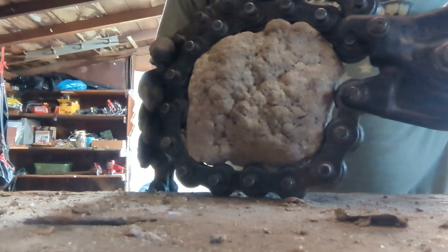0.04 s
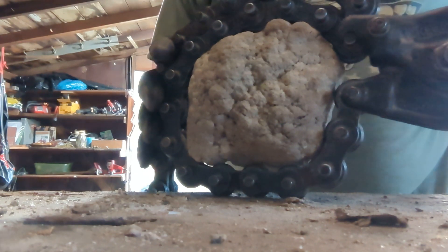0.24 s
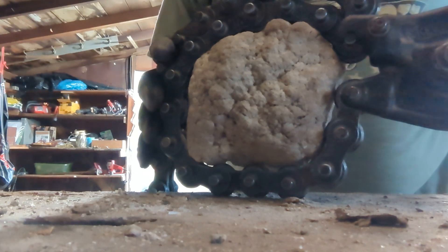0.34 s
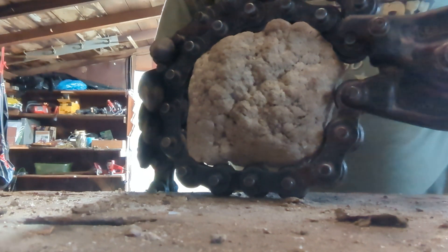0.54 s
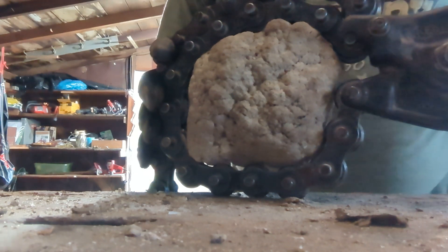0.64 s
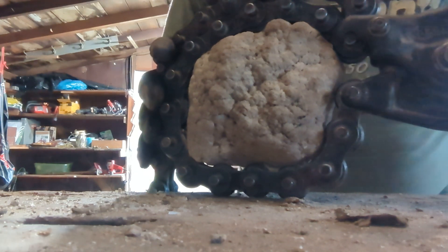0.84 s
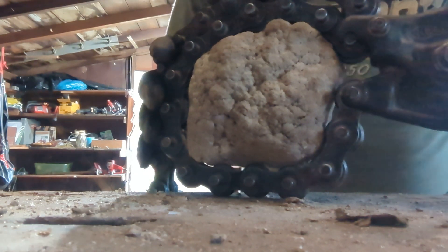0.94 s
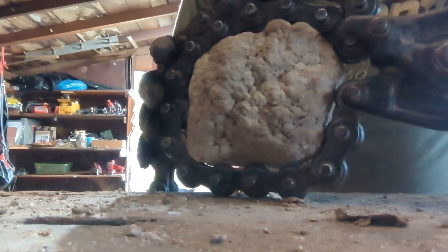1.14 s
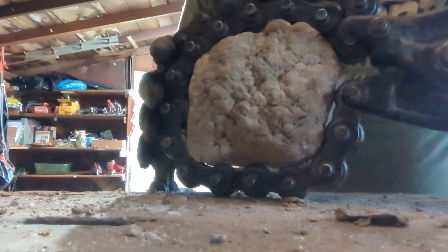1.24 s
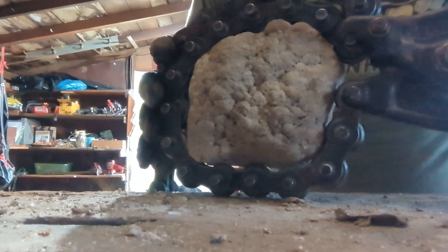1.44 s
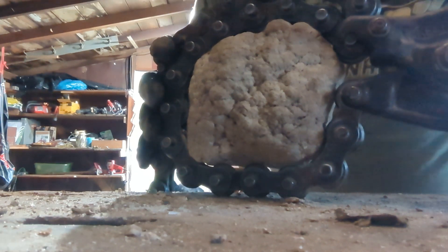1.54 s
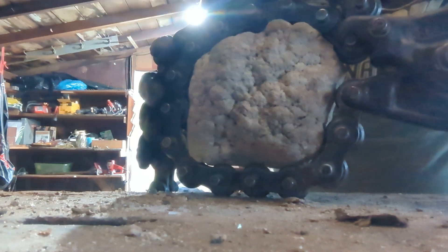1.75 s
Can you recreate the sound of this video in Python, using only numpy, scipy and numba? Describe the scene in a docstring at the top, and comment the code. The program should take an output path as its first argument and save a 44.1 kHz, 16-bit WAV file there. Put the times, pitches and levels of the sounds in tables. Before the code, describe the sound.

Stone cracks and clicks under a chain wrench, heard close up in a small workshop. One hard slip clanks the links and thumps the bench, then smaller cracks continue with fine gritty crackle over a faint low rumble.

```python
"""A small workshop, the microphone a hand's width from a stone on the bench, a chain wrench round it.
Over a low rumble the chain tightens, and grains crush under the links in sharp clicks.
At 0.2 s it slips hard: the links ring, the bench knocks, the stone shifts and the room answers.
The recorder turns itself down after the loudest cracks. More clicks and lighter slips follow,
and from about 0.8 s fine grit crackles louder as the chain is drawn tight."""
import sys
import numpy as np
from scipy import signal
from scipy.fft import rfft, irfft
from scipy.io import wavfile
from scipy.ndimage import uniform_filter1d, minimum_filter1d
from numba import njit

SR = 44100
rng = np.random.default_rng(int(sys.argv[2]) if len(sys.argv) > 2 else 0)


def to_wav(sig):
    """Store sig (one row per channel, or 1-D mono) as 16-bit WAV at the path in sys.argv[1].

    Samples outside -1..1 are clipped; the rate is SR.
    """
    pcm = np.clip(np.atleast_2d(sig), -1, 1) * 32767
    pcm = np.round(pcm).astype(np.int16)
    wavfile.write(sys.argv[1], SR, pcm.T)  # frames by channels


N = 79380
AGE = np.arange(int(.2 * SR)) / SR  # seconds since a blow

# Spectrum of a bursting grain. Each row: frequency in Hz, level in dB.
SNAP_COLOUR = [(4500, -21.5), (7500, -13.5), (9500, -5), (11200, -2), (15000, -2.5), (16500, -12.5)]


def undb(db):
    """Decibels to gain."""
    return 10 ** (np.asarray(db) / 20)


def at(table, hz):
    """Read a (Hz, value) table on a log frequency axis."""
    freqs, values = np.array(table, float).T
    return np.interp(np.log(np.maximum(hz, 1)), np.log(freqs), values)


def unit(x):
    """Scale a blow to the energy of 10 ms at level 1."""
    return x / np.sqrt(np.sum(x ** 2) / len(x) / (SR / 100) + 1e-18)


def colour(x, table, size=1024):
    """Minimum-phase filter with the given (Hz, dB) spectrum."""
    cepstrum = irfft(np.log(undb(at(table, np.fft.rfftfreq(size, 1 / SR)))))
    cepstrum[1:size // 2] *= 2
    cepstrum[size // 2 + 1:] = 0
    impulse = irfft(np.exp(rfft(cepstrum)))
    return signal.fftconvolve(x, impulse[None], axes=1)[:, :x.shape[1]]


def even(x, bins):
    """Flatten a burst's spectrum, so that only its colour shapes it."""
    spectrum = rfft(x, 2 * len(AGE))
    power = uniform_filter1d(np.abs(spectrum) ** 2, bins, axis=1)
    return irfft(spectrum / np.sqrt(np.abs(power) + 1e-18))[:, :len(AGE)]


def pair(size, alike=0, pan_db=0):
    """Left and right noise with correlation `alike`; a positive pan leans left."""
    mid, side = rng.standard_normal((2, size))
    noise = np.sqrt(1 + alike) * mid + np.sqrt(1 - alike) * side * np.array([[1], [-1]])
    return noise * undb([[pan_db / 2], [-pan_db / 2]])


def fade(t60, attack_s):
    """Quick rise, then a decay of 60 dB in t60 seconds."""
    return (1 - np.exp(-AGE / attack_s)) * np.exp(-np.log(1000) * AGE / t60)


def add(out, start, x):
    """Mix a sound in at its start in seconds."""
    i = max(int(start * SR), 0)
    out[:, i:i + x.shape[1]] += x[:, :max(N - i, 0)]


def modes(table, attack_s, scatter_db, sag=0, sag_s=.012, port_hz=494):
    """Modes weighted anew by each blow; higher ones reach the microphone's two ports out of step."""
    out = 0
    clock = AGE + sag * sag_s * (1 - np.exp(-AGE / sag_s))
    for hz, db, t60 in table:
        weight, detune, side, phase = rng.standard_normal(4)
        lag = np.sign(side) * min(hz / port_hz, 1) ** 2 * np.array([[1], [-1]]) * np.pi / 3.5
        angle = 2 * np.pi * (hz * (1 + 0.012 * detune) * clock + phase) + lag
        out = out + undb(db + scatter_db * weight) * fade(t60, attack_s) * np.sin(angle)
    return unit(out)


def background(start_db=-53.5, rise_db_per_s=3.5):
    """Room tone: low rumble and faint hiss, slowly growing."""
    # Spectrum of the room tone. Each row: frequency in Hz, level in dB.
    room_tone = [(30, -13), (65, -0.5), (400, -4.5), (900, -15), (4000, -25), (13000, -31)]
    tilt = undb(at(room_tone, np.fft.rfftfreq(N, 1 / SR)))
    noise = irfft(rfft(pair(N, alike=0.61, pan_db=-1.0)) * tilt, N)
    return noise / noise.std() * undb(start_db + rise_db_per_s * np.arange(N) / SR)


def workshop(x):
    """Diffuse echo of the room, octave by octave; the lows stay longest."""
    # Spectrum of the echo. Each row: frequency in Hz, level in dB.
    echo_colour = [(60, -15.5), (170, -5), (400, -10), (1700, -9), (4000, -15.5), (12000, -14.5),
                   (16000, -26)]
    # Decay of the room. Each row: frequency in Hz, t60 in seconds.
    echo_t60 = [(150, 1), (500, 0.35), (2000, 0.26), (14000, 0.32)]
    hz = np.fft.rfftfreq(N, 1 / SR)
    age = np.arange(N) / SR
    noise = rfft(pair(N, alike=0.066, pan_db=-1.5))
    echo = 0
    for centre in 62.5 * 2 ** np.arange(9):
        octave = np.clip(1 - np.abs(np.log2((hz + 1) / centre)), 0, 1)
        band = irfft(noise * octave * undb(at(echo_colour, hz)), N)
        shape = (1 - np.exp(-(age / 0.0027) ** 2)) * np.exp(-np.log(1000) * age / at(echo_t60, centre))
        echo = echo + band * shape / np.sqrt(2 * np.sum(shape ** 2))
    return signal.fftconvolve(x, echo, axes=1)[:, :N]


def bumps():
    """Soft jogs sound two low modes of the bench."""
    # Jogs of the bench. Each row: start in seconds, level in dB.
    jogs = [(.097, -43.5), (.806, -31.5)]
    out = np.zeros((2, N))
    for start, db in jogs:
        thud = modes([(73.6, 0.5, 0.09), (114, -1.5, 0.067)], attack_s=0.0095, scatter_db=1)
        add(out, start, undb(db) * thud)
    return out


def grit(kinds=12, grains_per_s=95, spread_db=3.5):
    """Tiny grains give way at random, crushed hardest as the chain is drawn tight."""
    # Loudness of the grit. Each row: time in seconds, base level in dB.
    grit_level = [(.65, -73), (.82, -61.5), (1.0, -61.5)]
    out = 0
    for _ in range(kinds):
        pulses = np.zeros((2, N))
        for when, draw in rng.random((int(grains_per_s * N / SR / kinds), 2)):
            base_db = np.interp(when * N / SR, *np.transpose(grit_level))
            pulses[:, int(when * N)] += undb(base_db - spread_db * np.log(0.056 + draw))
        grain = snap(grain_note()) + undb(-4) * ring(rng.uniform(2750, 4500))
        out = out + signal.oaconvolve(pulses, grain, axes=1)[:, :N]
    return out


def grain_note():
    """The random note of a small grain, in Hz."""
    return rng.uniform(10700, 15300)


def snap(note_hz, peak_db=7, width_hz=1400):
    """A grain bursts within a millisecond, with a shrill note of its own, and its dust crumbles."""
    burst = fade(t60=0.0027, attack_s=0.00038)
    crumble = undb(-4.5) * fade(t60=0.018, attack_s=0.00031) / 2
    noise = even(pair(len(AGE), alike=0.36) * (burst + crumble), bins=1200)
    hz = np.linspace(1000, 17000, 80)
    db = at(SNAP_COLOUR, hz) + peak_db * np.exp(-((hz - note_hz) / width_hz) ** 2)
    return unit(colour(noise, np.column_stack([hz, db])))


def crunch():
    """The dull, broad crunch of stone giving way; its bass reaches both ports in step."""
    # Spectrum of the crunch. Each row: frequency in Hz, level in dB.
    crunch_colour = [(110, -5.5), (450, 2), (1000, -10.5), (1600, -26.5), (5000, -54.5)]
    mid, side = even(pair(len(AGE)) * fade(t60=0.057, attack_s=0.00086), bins=80)
    side = signal.sosfilt(signal.butter(2, 280, "high", fs=SR, output="sos"), side)
    return unit(colour(np.array([mid + side, mid - side]), crunch_colour) * undb([[3], [0]]))


def ring(link_hz, clear_t60=.04):
    """A steel link: one clear mode among tight, heavily damped ones."""
    # Spectrum of the damped modes. Each row: frequency in Hz, level in dB.
    ring_colour = [(1500, -31), (2500, 1), (4100, 1.5), (5000, -5), (8500, -12.5), (12000, -13.5)]
    burst = pair(len(AGE), alike=0.049, pan_db=-6.0) * fade(t60=0.03, attack_s=0.0002)
    dense = unit(colour(burst, ring_colour))
    clear = modes([(link_hz, 0, clear_t60)], attack_s=0.000095, scatter_db=0) * undb([[-2], [1.5]])
    return unit(dense + undb(-4) * clear)


def clank(link_hz, t60, peak_db=5.5, uneven_db=3.5):
    """Links chatter unevenly against the stone, lifted round their pitch, and sound their lower modes."""
    # Spectrum of the chatter. Each row: frequency in Hz, level in dB.
    chatter_colour = [(350, -22), (800, 1.5), (1600, 1.5), (2800, -3.5), (4200, -17.5)]
    # Lower modes of the links. Each row: frequency in Hz, level in dB, t60 in seconds.
    link_modes = [(1195, -5.5, 0.084), (1570, -0.5, 0.077), (2023, 3.5, 0.044), (2225, -1.5, 0.071)]
    flutter = undb(uneven_db * np.repeat(rng.standard_normal(len(AGE)), 64)[:len(AGE)])
    burst = even(pair(len(AGE)) * flutter * fade(t60, attack_s=0.00081), bins=160)
    hz = np.geomspace(200, 8000, 50)
    db = at(chatter_colour, hz) + peak_db * np.exp(-(2 * np.log2(hz / link_hz)) ** 2)
    chatter = unit(colour(burst, np.column_stack([hz, db])))
    tones = undb(-5.5) * modes(link_modes, attack_s=0.0013, scatter_db=0.5)
    return unit((chatter + tones) * undb([[-5], [0]]))


def crack(start, link_hz, note_hz, clank_db, ring_db, snap_db, clank_t60, strain_s=0.0021):
    """Strain crackles up to the snap, which sets the link ringing and clanking."""
    out = np.zeros((2, N))
    time_left = np.arange(int(4 * strain_s * SR))[::-1] / SR
    swell = pair(len(time_left), alike=0.73, pan_db=-6) * np.exp(-time_left / strain_s)
    strain = unit(colour(swell, SNAP_COLOUR))
    add(out, start - time_left[0], undb(snap_db - 19) * strain)
    add(out, start, undb(snap_db) * snap(note_hz) + undb(ring_db) * ring(link_hz))
    add(out, start + .0006, undb(clank_db) * clank(link_hz, clank_t60))
    return out


def chain(knock_lag_s=.001, thud_lag_s=0.0041):
    """Small cracks, the slips that also shake the bench, and the stone shifting after the biggest."""
    # Grains cracking under a link. Each row: start in seconds, link pitch in Hz, ring and snap in dB.
    clicks = [ (0.0241, 2790, -46.5, -42.5), (0.0306, 2670, -46, -41), (0.0703, 3410, -42.5, -45.5),
              (0.076, 3220, -46, -44), (.133, 3430, -48, -42.5), (0.2001, 3310, -32, -32),
              (0.406, 2797, -33.5, -35.5), (0.5106, 2490, -28, -34), (0.6051, 3360, -40.5, -39),
              (0.6687, 4050, -36, -35.5), (.741, 2655, -41, -43), (0.9617, 3750, -35, -34),
              (0.9781, 2990, -32, -25.5), (1.048, 3500, -52, -36.5), (1.092, 4250, -48, -38.5),
              (1.2063, 2320, -38.5, -35.5), (1.2251, 5780, -40, -39), (1.3463, 4070, -42, -53),
              (1.4074, 3920, -37.5, -33.5), (1.426, 3430, -37, -38), (1.4473, 2940, -35.5, -32),
              (1.6086, 2810, -40.5, -36), (1.6347, 3300, -36.5, -41), (1.7291, 4090, -29, -37.5),
              (1.791, 2725, -41, -34)]
    # The chain slipping on the stone. Each row: start in seconds, link pitch and snap note in Hz,
    # levels of thud, knock, crunch, clank, ring and snap in dB, clank t60 in seconds.
    slips = [ (0.2087, 1173, 14700, -17.5, -11, -7.5, -15.5, -16, -18, 0.079),
             (.4150, 2795, 12600, -37.5, -33.5, -33.5, -33.5, -33, -43, 0.065),
             (0.6090, 2340, 11800, -44.5, -36.5, -37, -34, -33, -25.5, 0.053),
             (0.9857, 2800, 13000, -28, -22, -27, -30, -27, -22, 0.014),
             (1.1536, 2273, 11900, -31, -24, -26.5, -21.5, -24.5, -19, 0.033),
             (1.4595, 1840, 10300, -28, -27.5, -25, -21, -31, -24.5, 0.23)]
    # Middle and low modes of bench and tool. Each row: frequency in Hz, level in dB, t60 in seconds.
    knock_modes = [(169, -6, 0.19), (220.7, -2, 0.15), (261.7, 0.5, .12), (346.3, -2.5, 0.099),
                   (417, 3, 0.13), (523.4, -1.5, 0.12), (648, -8.5, 0.17)]
    thud_modes = [(58.8, -6, 0.32), (71.3, 6.5, 0.11), (116, -7.5, .15), (142.3, -7.5, 0.25)]
    # The stone shifting. Each row: start in seconds, level in dB.
    shifts = [(0.2196, -15.5), (.233, -16.5), (.246, -18.5)]
    out = np.zeros((2, N))
    for start, link_hz, ring_db, snap_db in clicks:
        clank_db = ring_db - 5.5 - 7.5 * np.log2(link_hz / 2560)  # low-pitched links clank more
        out += crack(start, link_hz, grain_note(), clank_db, ring_db, snap_db, clank_t60=0.054)
        add(out, start + knock_lag_s, undb(ring_db - 12.5) * crunch())
    for start, link_hz, note_hz, thud_db, knock_db, crunch_db, clank_db, ring_db, snap_db, t60 in slips:
        out += crack(start, link_hz, note_hz, clank_db, ring_db, snap_db, t60)
        # The knock starts sharp and sinks in pitch as the load lets go.
        knock = modes(knock_modes, attack_s=0.0008, scatter_db=1, sag=0.17)
        add(out, start + knock_lag_s, undb(knock_db) * knock + undb(crunch_db) * crunch())
        thud = modes(thud_modes, attack_s=0.0072, scatter_db=2.0) * undb([[-1.5], [1.5]])
        add(out, start + thud_lag_s, undb(thud_db) * thud)
    for start, db in shifts:
        add(out, start, undb(db) * crunch())
    return out


def scene():
    """At the microphone: the close sounds on the bench, their echo and the room tone."""
    near = chain() + bumps() + grit()
    return near + workshop(near) + background()


@njit
def follow(x, release):
    """Peak follower with a slow release."""
    out, held = np.empty(len(x)), 0.
    for i in range(len(x)):
        held = max(x[i], held * (1 - release))
        out[i] = held
    return out


def record(dry, limit_db=-2.5, release_s=0.53, low_cut_hz=42, top_hz=15900):
    """The recorder's limiter ducks after the loudest peaks; the lowest bass and the top are cut."""
    peak = follow(np.abs(dry).max(axis=0), 1 / (release_s * SR))
    gain = np.minimum(1, undb(limit_db) / (peak + 1e-9))
    gain = uniform_filter1d(minimum_filter1d(gain, size=65), size=65)
    lean = signal.sosfilt(signal.butter(4, low_cut_hz, "high", fs=SR, output="sos"), dry * gain)
    return signal.sosfilt(signal.ellip(8, .2, 70, top_hz, fs=SR, output="sos"), lean)


dry = scene()
out = record(dry)
to_wav(out)
```